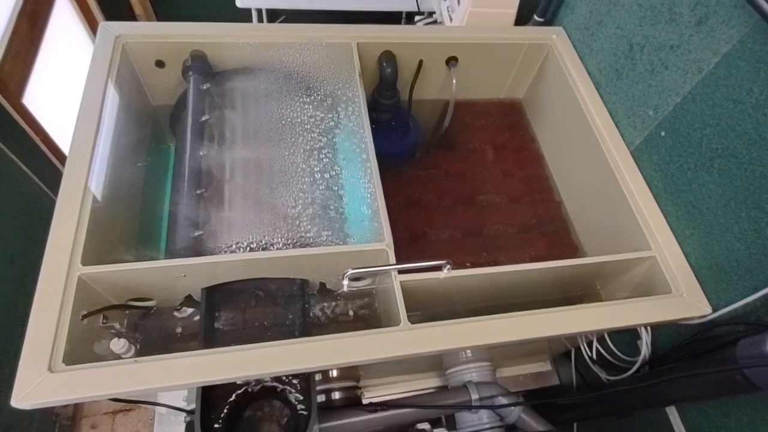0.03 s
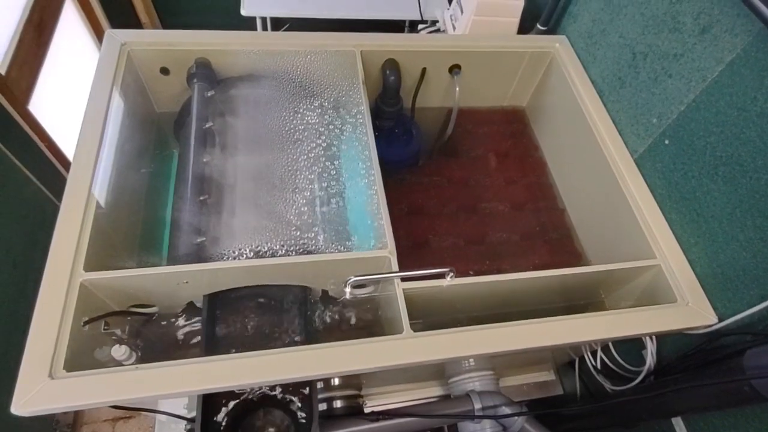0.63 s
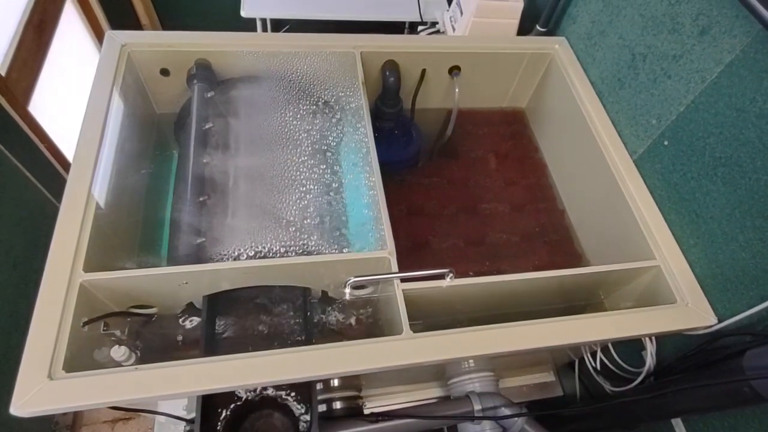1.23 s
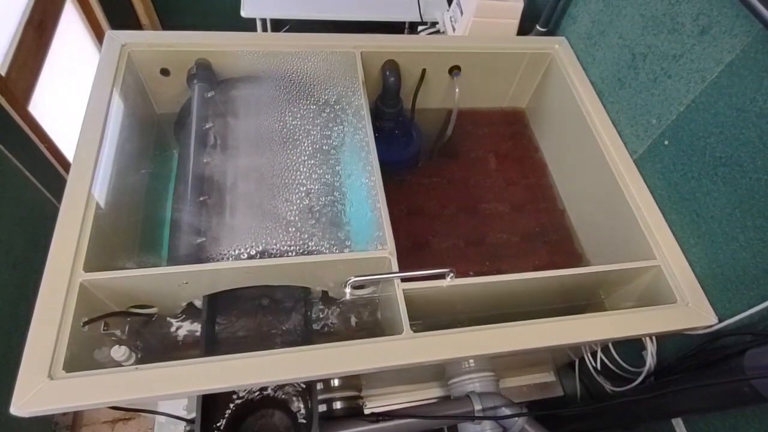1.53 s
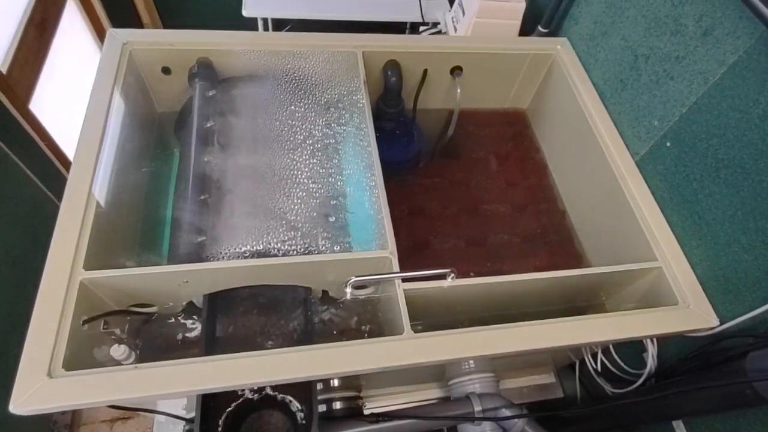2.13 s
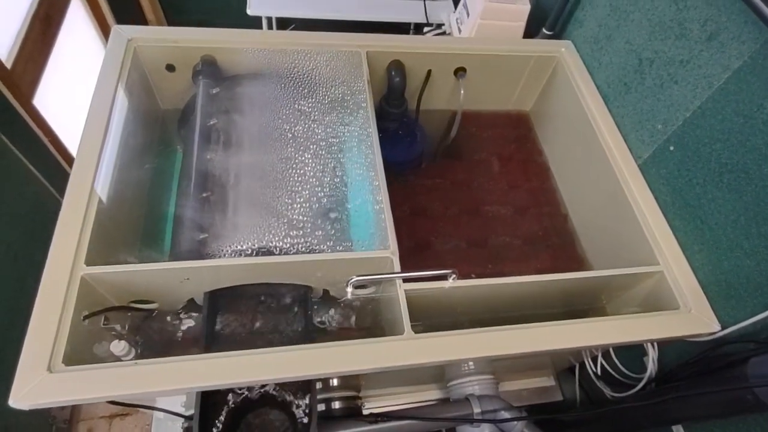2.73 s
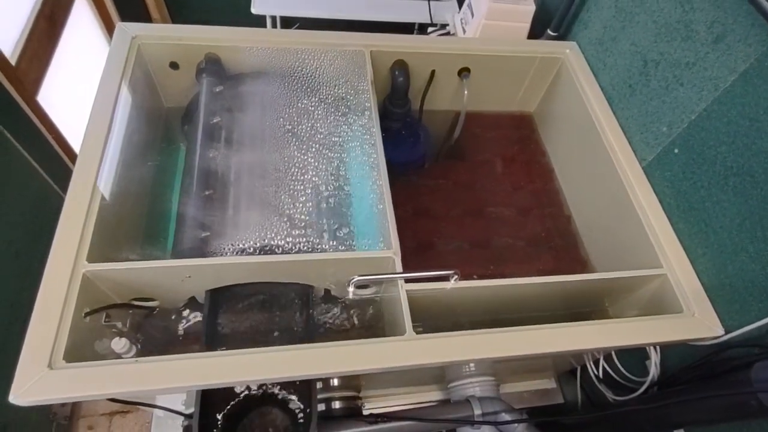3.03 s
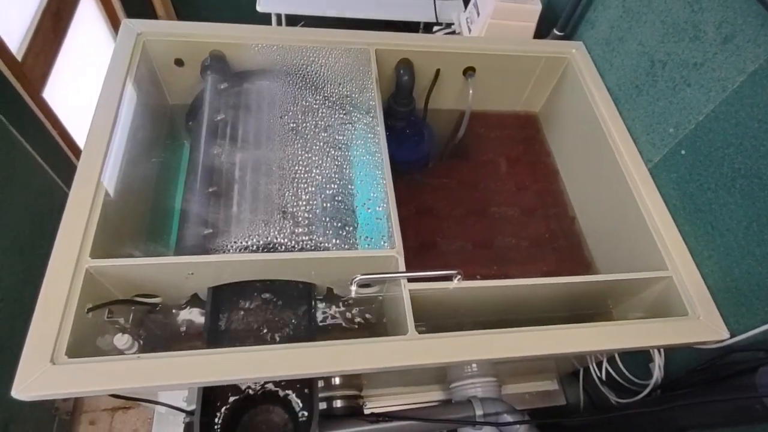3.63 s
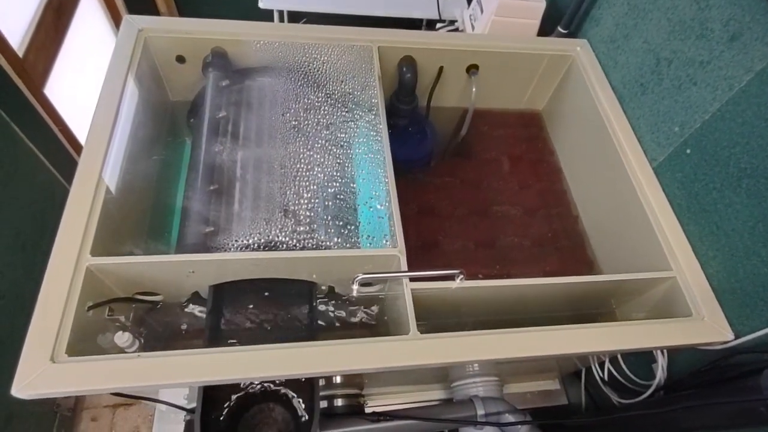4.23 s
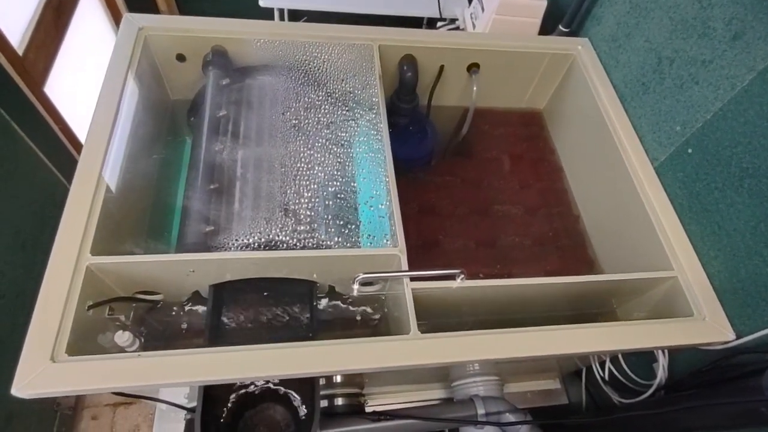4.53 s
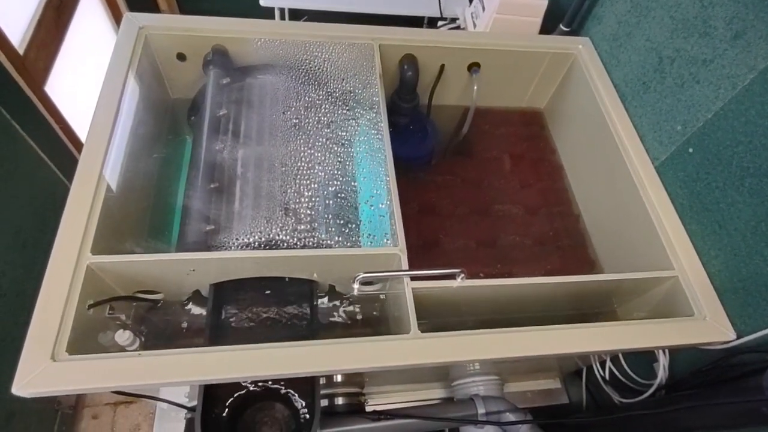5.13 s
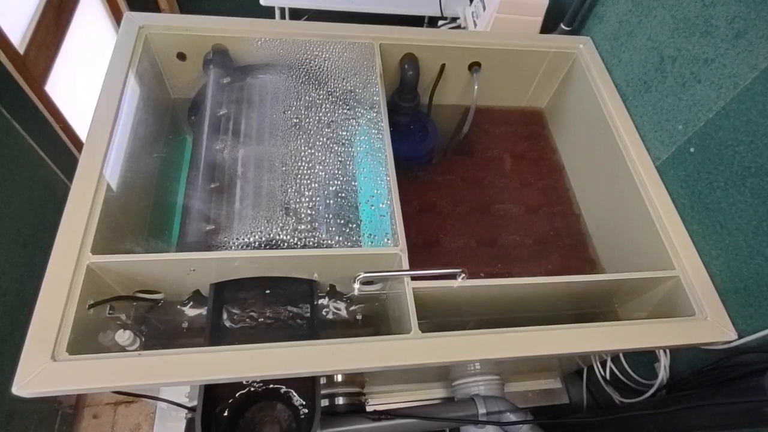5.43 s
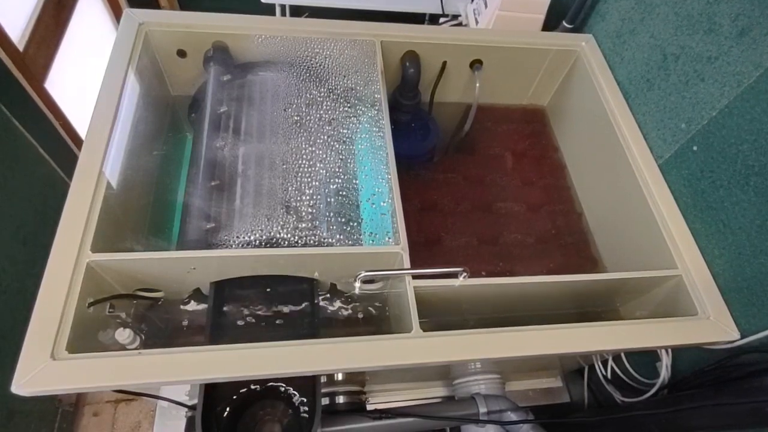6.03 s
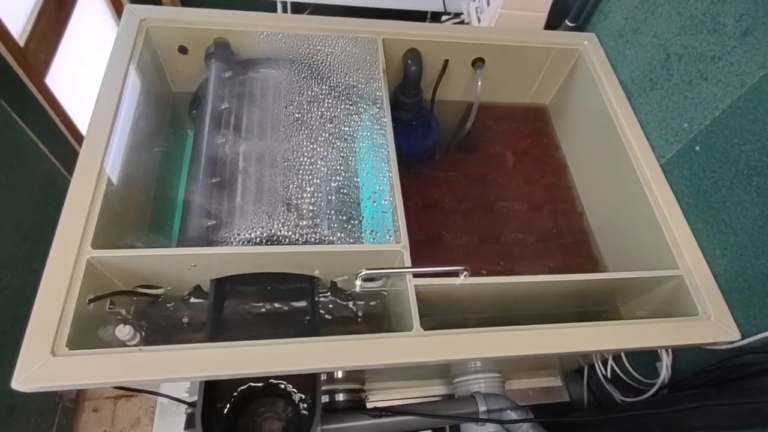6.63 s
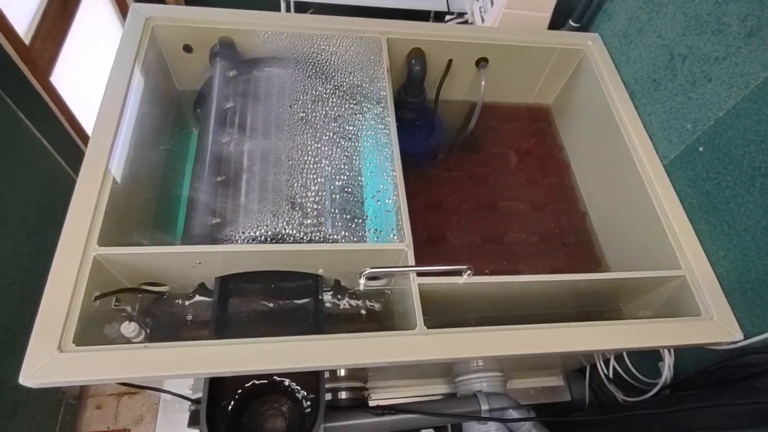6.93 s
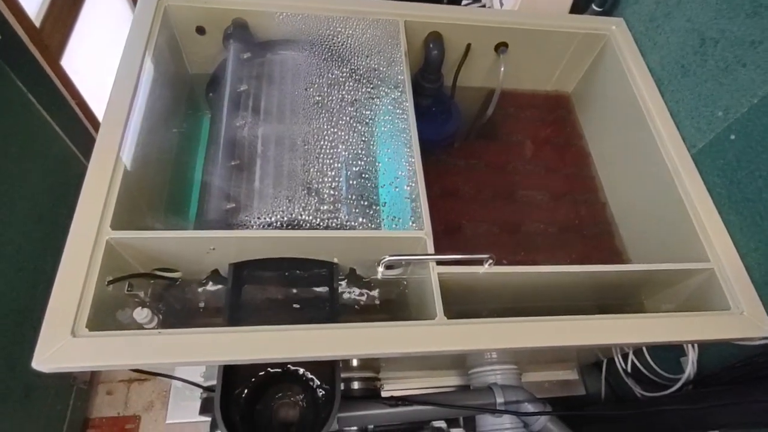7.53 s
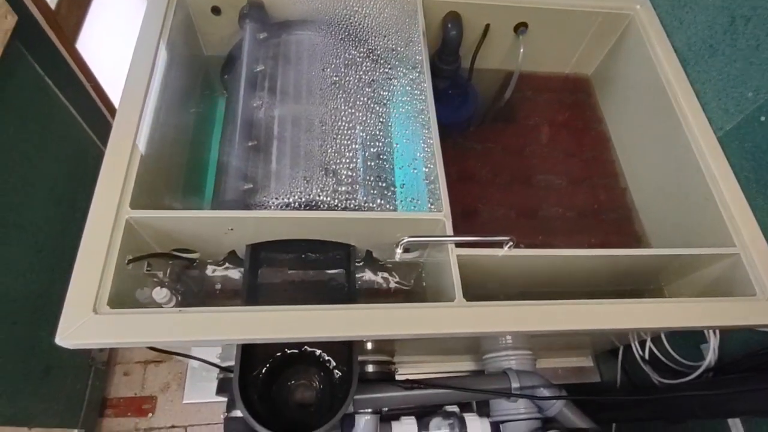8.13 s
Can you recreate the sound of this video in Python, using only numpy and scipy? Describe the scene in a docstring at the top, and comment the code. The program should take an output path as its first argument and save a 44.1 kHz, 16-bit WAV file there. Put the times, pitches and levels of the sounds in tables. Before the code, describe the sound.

Water jets spray the turning mesh drum of a pond filter with a loud, gently pulsing hiss, drumming on the wall of its plastic tank. After about three seconds the spray stops with a soft thump in the pipes. Water drains away, dripping less and less, until a quiet trickle is left gurgling in a trough. A pump hums faintly throughout, heard from just above the open tank in a small room.

```python
"""Spray jets rinse the turning mesh drum of a pond filter, heard from above its open plastic tank.
They hiss on the mesh, ring the panels and drum on the tank wall, swelling as each panel passes.
The spray pump stops with a thump in the pipes, the mesh drips less and less, and a trickle is left
gurgling in the waste trough. A circulation pump hums all along in the small room."""
import sys
import numpy as np
from scipy import signal
from scipy.fft import rfft, irfft, next_fast_len
from scipy.io import wavfile
from scipy.ndimage import map_coordinates

SR = 44100
rng = np.random.default_rng(int(sys.argv[2]) if len(sys.argv) > 2 else 0)


def waveform_to_disk(signal):
    """Save audio, clipped to [-1, 1], as 16-bit WAV at the path in sys.argv[1]."""
    frames = np.transpose(np.atleast_2d(signal))
    scaled = np.clip(frames, -1, 1) * 32767
    samples = np.round(scaled).astype(np.int16)
    wavfile.write(sys.argv[1], SR, samples)


N = 369999

# reverberation of tank and room: (frequency [Hz], time to fall 60 dB [s])
ROOM_DECAY = [(200, 0.26), (2000, 0.35), (12000, 0.13)]
# likeness of left and right: (frequency [Hz], correlation [0-1])
STEREO_LIKENESS = [(60, 1), (130, 0.62), (280, 0.94), (420, 0.66), (680, 0.34), (1100, 0.045), (3000, 0.1),
                   (15000, 0.037)]
# microphone colour: (frequency [Hz], left minus right [dB])
MIC_BALANCE = [(60, -2), (300, 1), (700, 0), (1400, 0), (5000, 0.7), (9000, -3), (15000, -0.5)]
# hum of the two mains-driven pumps: (frequency [Hz], relative level [dB])
CIRCULATION_TONES = [(49.6, -72), (100, -64.5), (117, -73), (199, -70), (300, -72), (384, -70.5),
                     (581, -76.5), (967, -74)]
SPRAY_PUMP_TONES = [(49.6, -71), (100, -62), (199, -59), (300, -50), (900, -54)]
# water running down the waste tray after the rinse: (time [s], flow over the lasting trickle [dB])
TRAY_FLOW = [(3.3, 12.5), (3.7, 12), (4.0, 8.5), (4.2, 4), (5.1, 1.5), (6.4, 0), (7.5, -0.5), (8.39, -1)]
# waves in the trough: (centre [s], length [s], slosh swell [dB], outlet swell [dB], drone swell [dB])
WAVES = [(3.47, 0.091, 7, 0, 4), (3.61, 0.1, 3.5, 0.5, 3), (3.87, .2, 2, 0.5, 2), (4.0, 0.079, 4, 0, 0),
         (4.467, 0.17, 3, 0.5, 7), (4.72, 0.18, 2, 0, -3), (4.997, 0.13, 5.5, 2, 8),
         (5.31, 0.13, 7.5, 5.5, 8), (5.46, 0.11, 2, 5, 5), (5.577, .11, 1, 6.5, 0), (5.86, .14, 0, 4.5, 2),
         (6.067, .13, 4, 3.5, 6), (6.25, 0.089, 3, 8.5, 4.5), (6.55, .17, 4, 8.5, 8),
         (6.87, 0.37, 3.5, 5, 0), (7.06, 0.17, 3, 3, -3), (7.283, 0.15, 6, 5, 3), (7.54, 0.17, 6, 7, 3),
         (7.728, .13, 4, 2, 2), (7.87, 0.078, 8, 3, 4), (8.16, 0.26, 3, 2, 0), (8.33, .1, 3, 3, 2)]
# water slopping onto the tray: (centre [s], length [s], rise of its ring [dB])
TRAY_SLOPS = [(3.69, .08, 0), (4.11, 0.062, 3), (4.95, 0.04, 11), (5.015, 0.063, 8.5), (5.3, .06, 2),
              (5.41, .06, 3), (5.49, .05, 5)]
# heavier spray slapping the tank wall: (centre [s], length [s], rise [dB])
WALL_SLAPS = [(1.42, 0.099, 4)]
# spectra of the draining water: (frequency [Hz], relative density [dB])
SLOSH_SPECTRUM = [(25, -30), (60, -3), (115, 1.5), (160, -3.5), (195, 3), (220, -6.5), (260, 6),
                  (335, -3.5), (385, 2), (450, -5.5), (600, -8.5), (1200, -45)]
BABBLE_SPECTRUM = [(300, -32.5), (480, -12), (600, 0.5), (850, -0.5), (1150, 5), (1300, 0.5), (1700, -22)]
OUTLET_SPECTRUM = [(900, -24.5), (1300, -11), (1480, -3), (1620, -7), (1820, -3.5), (2250, -5), (2600, -5),
                   (3300, -22), (5000, -45)]
TRAY_SPECTRUM = [(1800, -18), (2350, -3), (2620, -10), (2800, -2), (3020, -5), (3250, -12), (4000, -32)]
FIZZ_SPECTRUM = [(1800, -19), (3200, -3.5), (3800, -3.5), (4500, -1), (5600, -2.5), (7000, -4), (8200, -7),
                 (10500, -12), (13000, -16), (15500, -19)]
FILM_SPECTRUM = [(3500, -22), (4400, 3), (4800, -9), (5800, -3.5), (7200, -4), (8300, -5), (10100, -1),
                 (11500, -5.5), (15500, -5)]
# spectra of the jets on mesh, panels and tank wall: (frequency [Hz], relative density [dB])
HISS_SPECTRUM = [(1500, -45), (2700, -6), (3400, -3), (4300, -1.5), (6000, -3), (8000, -6), (11500, -12.5),
                 (15500, -11.5)]
PANEL_SPECTRUM = [(900, -37), (1200, -20), (1400, -3), (1850, -2.5), (1960, -4), (2150, -0.5), (2650, -1),
                  (3000, -2), (3500, -21), (5000, -36.5)]
WALL_SPECTRUM = [(30, -40), (90, -15.5), (160, -21.5), (215, -10.5), (260, 2), (335, -6), (400, 2.5),
                 (480, -8.5), (580, -10.5), (690, 0.5), (1000, -6), (1250, 1), (1700, -23.5)]
# resonances of the parts the water strikes: (frequency [Hz], width [Hz], level re the spectrum [dB])
TRAY_MODES = [(2620, 110, 9)]
MESH_MODES = [(3510, 30, -2), (3670, 34, 1), (3943, 30, -2), (4118, 55, -1), (4300, 110, -3)]
PANEL_MODES = [(1398, 22, 6), (1579, 30, 9), (1737, 20, 8), (1873, 24, 7), (2057, 30, 4), (2298, 20, 3),
               (2464, 14, 6), (2530, 38, 8), (2696, 36, 7)]
WALL_MODES = [(196, 10, 6), (258, 14, 1), (296, 16, 2), (600, 16, 3), (750, 14, 3), (820, 14, 2),
              (900, 12, 5), (962, 14, 2), (1112, 14, 9)]
# large bubbles, plinking drops and gulps of air: (time [s], relative level [dB], pitch [Hz])
TROUGH_BUBBLES = [(3.5758, -40, 1230), (3.6576, -30, 3000), (3.9449, -35.5, 2730), (3.9689, -36.5, 1480),
                  (4.4393, -44, 1500), (4.7094, -49, 1040), (4.9334, -42, 2650), (4.9594, -44, 2530),
                  (5.0194, -46, 2560), (5.2694, -42, 1450), (5.2824, -39.5, 1310), (5.3946, -45, 2540),
                  (5.4455, -39.5, 1250), (5.4544, -45, 1220), (5.5694, -43, 1820), (5.5912, -46, 1190),
                  (5.8476, -41, 1770), (6.2138, -42, 1870), (6.2594, -52, 1650), (6.5071, -39, 1750),
                  (6.5394, -45, 1690), (6.5694, -46, 1440), (6.7994, -44, 1790), (6.914, -43, 1770),
                  (7.4879, -38, 2160), (7.5368, -36.5, 1940), (7.5624, -47, 1790), (7.6705, -47, 1190),
                  (7.8635, -49, 1120)]
MESH_DROPS = [(3.4294, -36, 4420), (3.4594, -43, 4660), (3.6394, -40, 4540), (4.0094, -45, 6610),
              (4.0716, -42, 4770), (4.1194, -44, 6030), (4.1394, -44, 4790), (5.1682, -45, 4300),
              (5.3328, -45, 4310), (5.3612, -41.5, 7150), (5.5494, -49, 4320), (6.0494, -52, 4230),
              (6.8594, -50, 4160), (7.2994, -48, 4660)]
PIPE_GULPS = [(3.438, -31.5, 375), (6.517, -43, 200), (7.498, -50, 256), (7.861, -46, 261),
              (7.888, -46, 255)]
# small splashes: (time [s], relative level [dB])
SPLASHES = [(3.82, -45), (4.129, -37), (4.35, -49), (4.6494, -44), (4.9317, -37), (5.3388, -50.5),
            (5.5672, -45), (5.8294, -49), (6.2994, -52), (7.305, -47), (7.453, -48)]

PORT_LAG_S, MIC_TOP_HZ = .00018, 15780
PANEL_RATE_HZ, FIRST_PANEL_S = 2.537, .21
# once the spray pump is cut, the jets fade ever faster as the pressure goes
CUT_S, RUN_DOWN_S, RUN_DOWN_DB, RUN_DOWN_BEND = 3.103, 0.2, 22.5, 2.02


def amp(db):
    """Decibels to gain."""
    return 10 ** (np.asarray(db) / 20)


def unit(x):
    """Scale to rms 1."""
    return x / np.sqrt(np.mean(x ** 2) + 1e-20)


def along(points, hz):
    """Read (frequency, value) points on a log frequency axis."""
    freqs, values = np.transpose(points)
    return np.interp(np.log(hz + 1), np.log(freqs + 1), values)


def wobble(rate):
    """A smooth random curve, rate knots a second."""
    knots = rng.standard_normal(int(N * rate / SR) + 4)
    return map_coordinates(knots, [np.arange(N) * rate / SR])


def swell(t, centre_s, length_s):
    """A smooth rise from 0 to 1 and back, about length_s wide."""
    return np.exp(-np.abs(2 * (t - centre_s) / length_s) ** 3)


def add(track, s, sound):
    """Mix a sound in at s seconds."""
    part = track[:, round(s * SR):][:, :sound.shape[1]]
    part += sound[:, :part.shape[1]]


def filtered(x, response):
    """Pass x through a frequency response."""
    size = next_fast_len(N + SR // 2)
    return irfft(rfft(x, size) * response(np.fft.rfftfreq(size, 1 / SR)), size)[..., :N]


def coloured(pair, spectrum, modes=()):
    """Two unrelated signals become stereo of rms 1, with a broad spectrum and resonances on it."""
    def response(hz):
        peaks = sum(amp(db) ** 2 / (1 + (2 * (hz - centre) / width) ** 2) for centre, width, db in modes)
        angle = np.arccos(np.clip(along(STEREO_LIKENESS, hz), -1, 1)) / 2
        return amp(along(spectrum, hz)) * np.sqrt(1 + peaks) * np.array([np.cos(angle), np.sin(angle)])
    mid, side = filtered(pair, response)
    return unit(np.array([mid + side, mid - side]))


def room(x, wet_db):
    """The direct sound plus a tail from tank and walls for each side of the microphone."""
    hz, t, noise = signal.stft(rng.standard_normal((2, SR // 3)), SR, nperseg=256)
    tail = signal.istft(noise * amp(-60 * t / along(ROOM_DECAY, hz)[:, None]), SR, nperseg=256)[1]
    impulse = amp(wet_db) * tail / np.linalg.norm(tail[0])
    impulse[:, 0] += 1
    return signal.fftconvolve(np.atleast_2d(x), impulse / np.linalg.norm(impulse[0]), axes=1)[:, :N]


def ports(x, lag):
    """A source to one side reaches the left microphone port lag seconds after the right."""
    return filtered(x, lambda hz: np.exp(1j * np.pi * hz * lag * np.array([[-1], [1]])))


def tones(lines, waver_db, drift):
    """Motor tones, each unsteady in level and phase."""
    t = np.arange(N) / SR
    hum = np.zeros(N)
    for hz, db in lines:
        gain = np.sqrt(2) * amp(db + waver_db * wobble(6))
        hum += gain * np.sin(2 * np.pi * (hz * t + rng.random()) + drift * wobble(3.1))
    return hum


def patter(rate, spread_db, mist_db):
    """Two streams of drop impacts of uneven size, over a mist of drops too fine to tell apart."""
    hits = rng.random((2, N)) < rate / SR
    sizes = np.clip(rng.standard_normal((2, N)), -2, 2)
    sizes *= amp(spread_db * np.clip(rng.standard_normal((2, N)), -2, 2))
    return unit(unit(hits * sizes) + amp(mist_db) * rng.standard_normal((2, N)))


def bubble(t, hz, cycles, rise):
    """A bubble rings down 60 dB over some cycles; its pitch rises as it nears the surface."""
    age = t * hz / cycles
    phase = 2 * np.pi * hz * t * (1 + rise * np.minimum(age, 2) / 2)
    return np.sin(phase) * amp(-60 * age) * (1 - np.exp(-2 * t * hz))


def swarm(count, low_hz, high_hz, cycles, spread_db, wash_db, samples=900):
    """Two streams of small random bubbles echo in the tank, on a wash of noise."""
    when, pitch, strength, place = rng.random((count, 4)).T
    hz = low_hz * (high_hz / low_hz) ** pitch
    gain = amp(spread_db * np.minimum(-np.log(1 - strength), 3))
    rings = gain[:, None] * bubble(np.arange(samples) / SR, hz[:, None], cycles, rise=0.2)
    index = ((when * N).astype(int)[:, None] + np.arange(samples)).ravel()
    shares = np.cos(2 * np.pi * place), np.sin(2 * np.pi * place)
    pair = np.array([np.bincount(index, (rings * share[:, None]).ravel(), N)[:N] for share in shares])
    return room(unit(pair), wet_db=4) + amp(wash_db) * rng.standard_normal((2, N))


def flow(t):
    """The flow in dB as the waste tray empties to a trickle."""
    return np.interp(t, *np.transpose(TRAY_FLOW))


def waves(t):
    """The swells in dB with which the waves drive slosh, outlet and pipe drone."""
    return sum(np.outer(rises, swell(t, s, length)) for s, length, *rises in WAVES)


def circulation_pump(drone_hz=65.3, thump_s=3.22):
    """The pump hums; its pipework drones with the surging water and thumps as the jets shut off."""
    t = np.arange(N) / SR
    _, _, wave_db = waves(t)
    thump_db = 11.5 * swell(t, thump_s, length_s=.1)
    drone_db = -63 + .5 * flow(t) + .85 * wave_db + thump_db
    rumble = coloured(rng.standard_normal((2, N)),
                      spectrum=[(35, -43.5), (56, -17), (66, -1.5), (78, -18), (120, -54), (400, -110)])
    drone = tones([(drone_hz, -1.5)], waver_db=1.2, drift=0.18) + amp(-4) * rumble
    return amp(drone_db) * drone + tones(CIRCULATION_TONES, waver_db=1.5, drift=0.53)


def trough():
    """Water runs down the tray, sloshes and babbles in the trough and folds over at the outlet."""
    t = np.arange(N) / SR
    flow_db = flow(t)
    wave_db, outlet_db, _ = waves(t)
    slop_db = sum(db * swell(t, s, length) for s, length, db in TRAY_SLOPS)
    slosh = coloured(patter(rate=600, spread_db=2, mist_db=3.5), SLOSH_SPECTRUM)
    low_bubbles = swarm(count=2500, low_hz=456, high_hz=1494, cycles=16, spread_db=1, wash_db=4)
    high_bubbles = swarm(count=2000, low_hz=1200, high_hz=3040, cycles=19, spread_db=2.5, wash_db=-1)
    runoff = coloured(patter(rate=570, spread_db=1.5, mist_db=1), TRAY_SPECTRUM, TRAY_MODES)
    babble_db = -61 + 1.04 * flow_db + 0.29 * wave_db + 0.47 * outlet_db + 0.92 * wobble(20)
    spill_db = -63 + 1.18 * flow_db + outlet_db + 0.51 * wobble(18)
    runoff_db = -64.5 + 1.18 * flow_db + slop_db
    slosh_db = -62 + 0.84 * flow_db + wave_db + wobble(18)
    babble = amp(babble_db) * coloured(low_bubbles, BABBLE_SPECTRUM)
    spill = amp(spill_db) * coloured(high_bubbles, OUTLET_SPECTRUM)
    return ports(babble + spill + amp(runoff_db) * runoff, PORT_LAG_S) + amp(slosh_db) * slosh


def dripping_mesh(drain_from_s=3.36, drain_s=1.44, film_from_s=3.87, drying_db_per_s=4):
    """Water spatters off the mesh and tiny bubbles burst in its wet film; both fade as it drains."""
    t = np.arange(N) / SR
    wetness = np.exp(-np.maximum(t - drain_from_s, 0) / drain_s)
    spatter = wobble(24)
    fizz = swarm(count=4500, low_hz=2976, high_hz=9040, cycles=36, spread_db=2.3, wash_db=7, samples=500)
    film = swarm(count=2500, low_hz=4000, high_hz=15000, cycles=12, spread_db=6.5, wash_db=-1,
                 samples=150)
    fizz_db = -60 + 10 * wetness + 0.59 * spatter
    film_db = -59 - drying_db_per_s * np.maximum(t - film_from_s, 0) + 1.3 * spatter
    return amp(fizz_db) * coloured(fizz, FIZZ_SPECTRUM) + amp(film_db) * coloured(film, FILM_SPECTRUM)


def gurgles():
    """Large bubbles, drops, splashes and air gulped by the waste pipe stand out of the trickle."""
    out, t = np.zeros((2, N)), np.arange(SR // 6) / SR
    for s, db, hz in TROUGH_BUBBLES:
        add(out, s, room(amp(db + 4.5) * bubble(t, hz, cycles=38, rise=.04), wet_db=0))
        # a large bubble sheds smaller ones around its own pitch just after it forms
        for late, detune in rng.random((3, 2)):
            shed = bubble(t, hz * 1.35 ** (2 * detune - 1), cycles=10, rise=.08)
            add(out, s + .025 * late, room(amp(db - 13) * shed, wet_db=-1))
    for s, db, hz in MESH_DROPS:
        add(out, s, room(amp(db + 8) * bubble(t, hz, cycles=44, rise=.04), wet_db=6))
    for s, db, hz in PIPE_GULPS:
        gulp = room(amp(db - 1) * bubble(t, hz, cycles=26, rise=0.14), wet_db=9)
        add(out, s, gulp.mean(0, keepdims=True))
    for s, db in SPLASHES:
        # a splash swells as its droplets land one after another
        envelope = amp(-60 * t / 0.089) * (1 - np.exp(-t / 0.0028))
        burst = np.diff(rng.standard_normal(len(t) + 1)) * envelope
        add(out, s, room(amp(db - 12.5) * burst, wet_db=-1))
    return out


def spray(bloom_db_per_s=0.9, tank_fade_share=0.54):
    """Pumped jets hiss on the mesh, ring the panels and drum on the tank until the pressure is gone."""
    t = np.arange(N) / SR
    facing = np.cos(2 * np.pi * PANEL_RATE_HZ * (t - FIRST_PANEL_S))  # 1 at a panel's middle
    fade_db = -RUN_DOWN_DB * np.clip((t - CUT_S) / RUN_DOWN_S, 0, 10) ** RUN_DOWN_BEND
    slap_db = sum(db * swell(t, s, length) for s, length, db in WALL_SLAPS)
    sputter = np.clip(wobble(70) + wobble(11), -2, 2)  # the jets break up unevenly
    drops = patter(rate=6000, spread_db=2.2, mist_db=1.5)
    hiss = coloured(room(drops, wet_db=-12), HISS_SPECTRUM, MESH_MODES)
    hiss *= amp(-19.5 + 1.4 * facing + 0.26 * sputter)
    panels = coloured(patter(rate=2200, spread_db=2, mist_db=5), PANEL_SPECTRUM, PANEL_MODES)
    panels *= amp(-24 + 2 * facing + 0.87 * sputter)
    # the strongest panel mode blooms at each panel's middle, a little more every time
    bloom_db = -39.5 + 7.5 * facing + bloom_db_per_s * t + 1.6 * wobble(16)
    bloom = coloured(rng.standard_normal((2, N)),
                     spectrum=[(1200, -36), (1520, -7), (1640, -7), (2000, -38)], modes=[(1579, 17, 19)])
    tank_db = -35 + 0.56 * facing + slap_db + 1.3 * wobble(12)
    tank = amp(tank_db) * coloured(drops, WALL_SPECTRUM, WALL_MODES)
    motor = amp(-3) * tones(SPRAY_PUMP_TONES, waver_db=6, drift=0.34)
    jets = amp(fade_db) * (hiss + panels + amp(bloom_db) * bloom)
    return ports(jets, -PORT_LAG_S) + amp(tank_fade_share * fade_db) * (tank + motor)


def scene():
    """Microphone above the open tank: jets left, drips and outlet right, low sounds in the middle."""
    return spray() + trough() + ports(dripping_mesh() + gurgles(), PORT_LAG_S) + circulation_pump()


def record(dry):
    """A stereo microphone whose two ports have slightly unlike colour; nothing passes above its band."""
    sides = np.array([[.5], [-.5]])
    return filtered(dry, lambda hz: amp(along(MIC_BALANCE, hz) * sides) * (hz < MIC_TOP_HZ))


dry = scene()
out = record(dry)
waveform_to_disk(out)
```